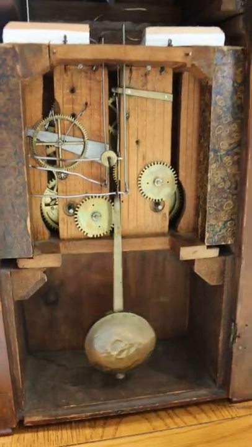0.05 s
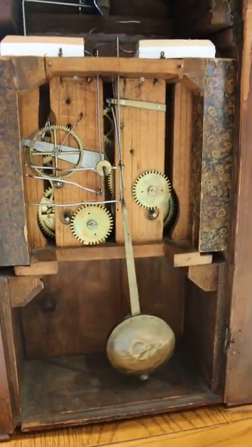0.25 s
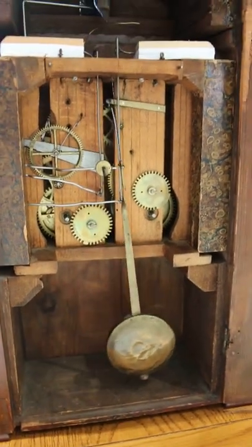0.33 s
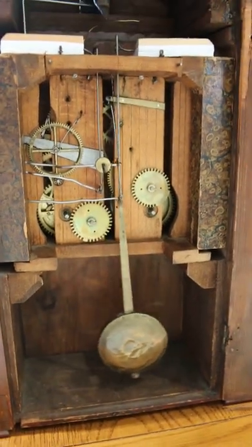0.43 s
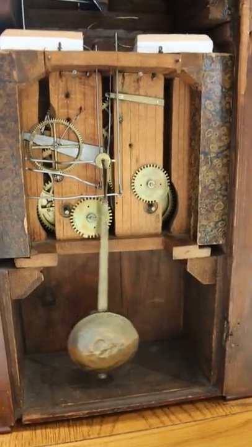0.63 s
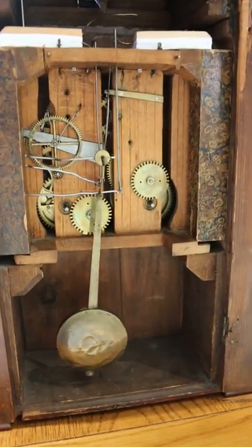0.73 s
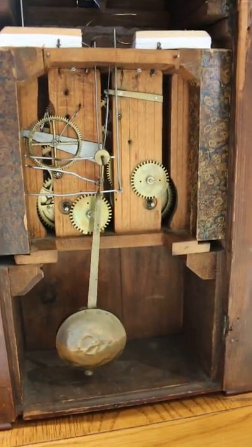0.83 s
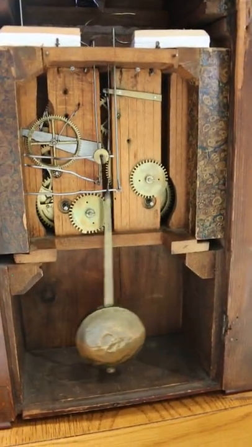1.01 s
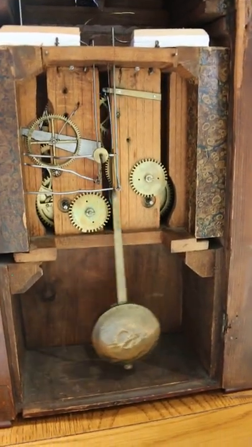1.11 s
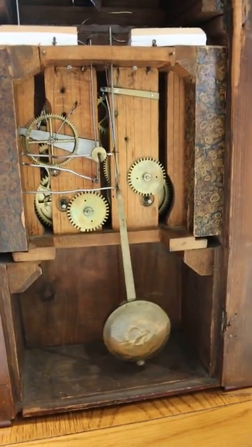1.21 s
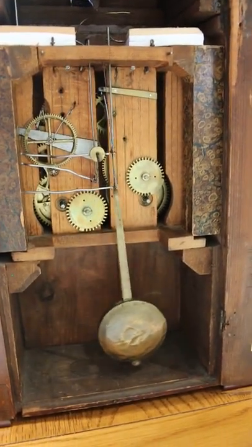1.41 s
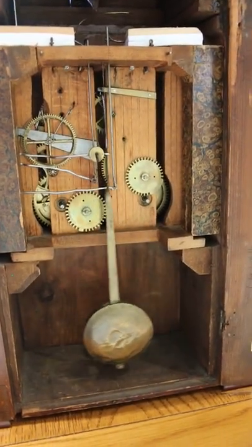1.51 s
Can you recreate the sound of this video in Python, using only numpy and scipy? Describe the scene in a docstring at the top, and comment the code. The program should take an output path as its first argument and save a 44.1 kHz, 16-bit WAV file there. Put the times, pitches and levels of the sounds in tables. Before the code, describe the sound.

A pendulum clock ticking with sharp brass clicks in a quiet room.

```python
"""Pendulum clock in a quiet room

The clock ticks in its open wooden case, a beat every half second. On each beat a tooth of the escape
wheel drops on a pallet: a sharp brass click and a brief rattle, then the case and the room ring on.
Between two beats something in the works knocks and rubs faintly; low room hum and hiss lie under it."""
import sys
import numpy as np
from scipy import signal
from scipy.fft import rfft, irfft, next_fast_len
from scipy.io import wavfile
from scipy.ndimage import map_coordinates

SR = 44100
rng = np.random.default_rng(int(sys.argv[2]) if len(sys.argv) > 2 else 0)


def inscribe(sig):
    """Save sig as 16-bit PCM at rate SR to the path in sys.argv[1].

    A 1-D sig is mono; a 2-D sig holds one channel per row.
    Samples are clipped to [-1, 1] before scaling.
    """
    pcm = np.round(np.clip(np.atleast_2d(sig).T, -1, 1) * 32767)
    wavfile.write(sys.argv[1], SR, pcm.astype(np.int16))


N = 68355
T = np.arange(SR) / SR  # one second, the span of each hit

# stereo image of the clock's close sounds: freq_hz, likeness (1 is mono, 0 is wide)
NEAR_IMAGE = [(200, 0.97), (850, 0.76), (2500, 1), (5000, 0.13), (10000, 0)]


def amp(db):
    """Decibels to gain."""
    return 10 ** (np.asarray(db) / 20)


def unit(x):
    """Scale to rms 1."""
    return x / np.sqrt(np.mean(x ** 2) + 1e-20)


def along(points, hz):
    """Read (freq_hz, value) points on a log frequency axis."""
    freqs, values = np.transpose(points)
    return np.interp(np.log(hz + 1), np.log(freqs + 1), values)


def rise(t, rise_s):
    """Attack from 0 toward 1 with time constant rise_s."""
    return 1 - np.exp(-t / rise_s)


def fade(t, t60):
    """Decay by 60 dB in t60 seconds."""
    return np.exp(-np.log(1000) * t / t60)


def pan(db):
    """Stereo gains for a level difference, left minus right."""
    return amp(np.array([[db], [-db]]) / 2)


def wobble(rate, size):
    """A smooth random curve, rate knots a second."""
    knots = rng.standard_normal(int(size * rate / SR) + 4)
    return map_coordinates(knots, [np.arange(size) * rate / SR])


def add(out, start_s, x):
    """Mix x into out from start_s."""
    i = round(start_s * SR)
    out[:, i:i + x.shape[1]] += x[:, :N - i]


def filtered(x, response):
    """Filter x by a gain given as a function of frequency."""
    n = x.shape[-1]
    padded = next_fast_len(n + SR // 2)
    return irfft(rfft(x, padded) * response(np.fft.rfftfreq(padded, 1 / SR)), padded)[..., :n]


def colour(x, curve):
    """Minimum-phase EQ from (freq_hz, gain_db) points: nothing sounds ahead of the hit."""
    size = 2 * SR
    cepstrum = irfft(np.log(amp(along(curve, np.fft.rfftfreq(size, 1 / SR)))))
    cepstrum[1:SR] *= 2
    cepstrum[SR + 1:] = 0
    return irfft(rfft(x, size) * np.exp(rfft(cepstrum)))[:, :SR]


def noise(gain, image, size):
    """Stereo noise of rms 1 with a given colour and left-right likeness."""
    def mid_side(hz):
        angle = np.arccos(np.clip(along(image, hz), -1, 1)) / 2
        return gain(hz) * np.array([np.cos(angle), np.sin(angle)])
    mid, side = filtered(rng.standard_normal((2, size)), mid_side)
    return unit(np.array([mid + side, mid - side]))


def burst(spectrum, decay, image, rise_s, hold_s=0):
    """Dense resonances rise and hold; then each frequency dies at its own speed."""
    wash = noise(lambda hz: amp(along(spectrum, hz)), image, SR)
    hz, t, bands = signal.stft(wash, SR, nperseg=128)
    bands = bands * fade(np.maximum(t - hold_s, 0), along(decay, hz)[:, None])
    return signal.istft(bands, SR)[1][:, :SR] * rise(T, rise_s)


def escapement():
    """Tick, tock, tick: each tooth clicks and rattles, and sets the case and the room ringing."""
    # when each tooth lands: start_s
    landings = (.2206, .7119, 1.2163)
    # how hard each tooth lands: click_db
    clicks = (-25, -22.5, -24.5)
    # mix of each beat: rattle_db, rattle_hold_s, case_db, tail_db, brightness_db, pallet
    beats = [(-34, 0.0075, -49.5, -43.5, -1, "tick"), (-39.5, 0.006, -43, -47, 0.5, "tock"),
             (-38.5, 0.0045, -44, -46, 1, "tick")]
    # where the brightness EQ acts: freq_hz, share
    brightness = [(1500, -0.42), (2400, -0.71), (3200, 0.94), (4300, 0.11), (7000, -0.63)]
    # tone of the tock's pallet against the tick's: freq_hz, gain_db
    tock_eq = [(300, 1), (750, -5), (1000, -1.5), (1500, -6.5), (2000, -3.5), (2350, 1), (3050, -2),
               (3600, -14), (4500, -9.5), (6300, -9.5), (7600, 1.5), (12000, -12)]
    # the first tooth rebounds on its pallet: start_s, click_db
    rebounds = [(0.2266, -29.5), (.2362, -32)]
    out = np.zeros((2, N))
    for start_s, click_db, mix in zip(landings, clicks, beats):
        rattle_db, hold_s, case_db, tail_db, bright_db, pallet = mix
        strike = amp(click_db) * click() + amp(rattle_db) * rattle(hold_s) + amp(case_db) * case_knock()
        tail = amp(tail_db) * pan(-1) * (ringing() + amp(4) * room_tail())
        beat = colour(strike + tail, [(hz, share * bright_db) for hz, share in brightness])
        add(out, start_s, colour(beat, tock_eq) if pallet == "tock" else beat)
    for start_s, click_db in rebounds:
        add(out, start_s, amp(click_db) * click())
    return out


def click(attack_s=0.00046, echo_db=-2.5, low_cut_hz=2050):
    """The tooth lands: a short ping of brass and its echo off the rear of the case."""
    # brass modes of the escapement: pitch_hz, level_db, t60_s
    modes = [(2384, -6.5, 0.021), (2630, 5, 0.0061), (3015, -2.5, 0.0098), (3340, -12.5, .024),
             (4257, -15.5, 0.066)]

    def ping(t):
        partials = sum(amp(db) * fade(t, t60) * np.sin(2 * np.pi * hz * t) for hz, db, t60 in modes)
        return partials * rise(t, attack_s)
    echo_s = np.array([[.0032], [.0039]])  # left, right
    echo = amp(echo_db) * ping(np.maximum(T - echo_s, 0))
    # small brass parts radiate little low end
    low_cut = signal.butter(4, low_cut_hz, btype='high', fs=SR, output='sos')
    return pan(-3.5) * signal.sosfilt(low_cut, ping(T) + echo)


def rattle(hold_s):
    """Wheel and pallet chatter for an instant after the landing."""
    # bright metal chatter: freq_hz, density_db
    spectrum = [(150, -27), (500, -27), (1200, -12), (1750, -7.5), (2050, -3.5), (2380, 1.5), (2800, -18),
                (3380, -2), (3800, -14), (4300, -6), (5600, -13.5), (8500, -23.5), (12300, -21),
                (14000, -41)]
    # its decay: freq_hz, t60_s
    decay = [(1500, 0.15), (2500, 0.036), (5000, 0.051), (12000, 0.015)]
    return pan(-2) * burst(spectrum, decay, NEAR_IMAGE, rise_s=0.00039, hold_s=hold_s)


def case_knock():
    """The wooden case answers the beat with a short knock."""
    # body of the wood: freq_hz, density_db
    spectrum = [(60, -22), (200, -9.5), (520, -14), (660, -7), (760, 0), (860, 3), (950, 1.5),
                (1150, -12.5), (1300, -51), (1520, 4), (2000, -24), (4000, -44)]
    # its decay: freq_hz, t60_s
    decay = [(200, .22), (750, .16), (1600, .09)]
    return burst(spectrum, decay, NEAR_IMAGE, rise_s=.008)


def ringing(rise_s=0.0098):
    """Case and movement ring on; each mode flutters as it dies, a little differently at each ear."""
    # lasting modes: pitch_hz, level_db, t60_s
    modes = [(736.3, 5.5, 0.19), (824, -4, 0.15), (950, -8, 0.38), (992, -14, 0.24), (1517, 1, 0.086),
             (1743, -10, 0.51), (1940, -27, 0.34), (2317, 4, 0.15), (2463, 0, 0.22), (2570, -1.5, 0.27),
             (3090, -23, 0.19), (3250, -9, 0.49), (3450, -2, .34), (3610, -18.5, .36), (4267, -4, 0.19)]
    out = np.zeros((2, SR))
    for hz, db, t60 in modes:
        flutter = np.array([wobble(45, SR), wobble(45, SR)])
        phase = 2 * np.pi * rng.random() + .6 * wobble(45, SR) + flutter * hz / 5500
        swell = amp(2.5 * wobble(45, SR))
        out += amp(db) * swell * fade(T, t60) * np.sin(2 * np.pi * hz * T + phase)
    return out * rise(T, rise_s)


def room_tail():
    """The room reverberates for about half a second, wider in the treble."""
    # reverb colour: freq_hz, density_db
    spectrum = [(150, -17.5), (500, -15.5), (800, -2), (1300, -8.5), (1800, -4), (2400, 0), (2900, -5),
                (3350, 2), (3900, -8.5), (6300, -12.5), (8500, -22), (14000, -31.5)]
    # reverb time: freq_hz, t60_s
    decay = [(300, 0.71), (1000, 0.54), (2800, 0.54), (6000, 0.47), (12000, 0.41)]
    # reverb stereo image: freq_hz, likeness
    image = [(200, 1), (900, 0.91), (2400, 0.32), (5000, 0)]
    return burst(spectrum, decay, image, rise_s=0.0033)


def works(waver_hz=45, grain_width_hz=150):
    """Faint hollow knocks and rubs in the works: a wavering resonance with a grainy skirt."""
    # knocks and rubs: start_s, level_db, pitch_hz, rise_s, t60_s
    rubs = [(.914, -48, 908.4, 0.0019, 0.29), (.96, -51, 745, 0.013, 0.37), (1.022, -53, 973, 0.0088, 0.31),
            (1.108, -56, 955, 0.0069, 0.44)]
    out = np.zeros((2, N))
    for start_s, db, pitch_hz, rise_s, t60 in rubs:
        wavering_hz = pitch_hz + waver_hz * wobble(396, SR)
        tone = np.sqrt(2) * np.sin(2 * np.pi * np.cumsum(wavering_hz) / SR)
        grain = noise(lambda hz: 1 / np.sqrt(1 + ((hz - pitch_hz) / grain_width_hz) ** 4), NEAR_IMAGE, SR)
        chatter = amp(3 * wobble(220, SR))
        add(out, start_s, amp(db) * unit(chatter * tone + grain) * rise(T, rise_s) * fade(T, t60))
    return out


def room_air(waver_db=2, hum_hz=375, hum_width_hz=45, air_db=-58):
    """Steady low rumble and hiss, with a faint wavering drone and a hum that comes and goes."""
    # rumble and hiss: freq_hz, density_db
    spectrum = [(25, -29), (60, -13), (95, -6), (126, -10), (160, -3.5), (340, -6.5), (500, -9), (920, -10),
                (1500, -13.5), (4600, -16.5), (12500, -22.5), (15500, -28)]
    # stereo image of air and hum: freq_hz, likeness
    image = [(60, 0.64), (380, 0.34), (950, 0.14), (2400, 0.02)]
    # tones of the drone: pitch_hz, level_db
    tones = [(102.3, -79), (156.1, -94)]
    # swells of the hum: time_s, level_db
    swells = [(0, -77), (.16, -65), (.3, -61.5), (.37, -79), (.47, -60), (.56, -72), (1.15, -97),
              (1.3, -65.5), (1.5, -76)]
    t = np.arange(N) / SR
    drone = np.zeros(N)
    for hz, db in tones:
        level = amp(db + waver_db * wobble(8.7, N))
        drone += level * np.sqrt(2) * np.sin(2 * np.pi * hz * t + wobble(8.2, N))
    hum = noise(lambda hz: 1 / (1 + ((hz - hum_hz) / hum_width_hz) ** 2), image, N)
    hum_level = amp(np.interp(t, *np.transpose(swells)))
    air = noise(lambda hz: amp(along(spectrum, hz)), image, N)
    return amp(air_db) * air + drone + hum_level * hum


def scene():
    """The clock in its room."""
    return escapement() + works() + room_air()


def record(dry):
    """A brick-wall high cut at 15.9 kHz."""
    return filtered(dry, lambda hz: hz < 15900)


dry = scene()
out = record(dry)
inscribe(out)
```